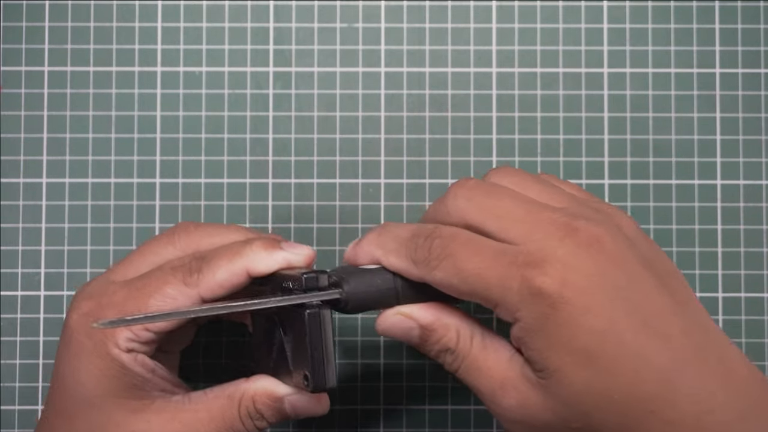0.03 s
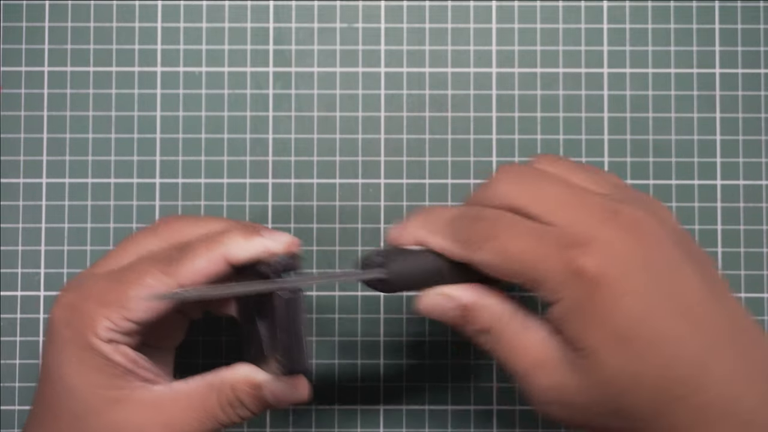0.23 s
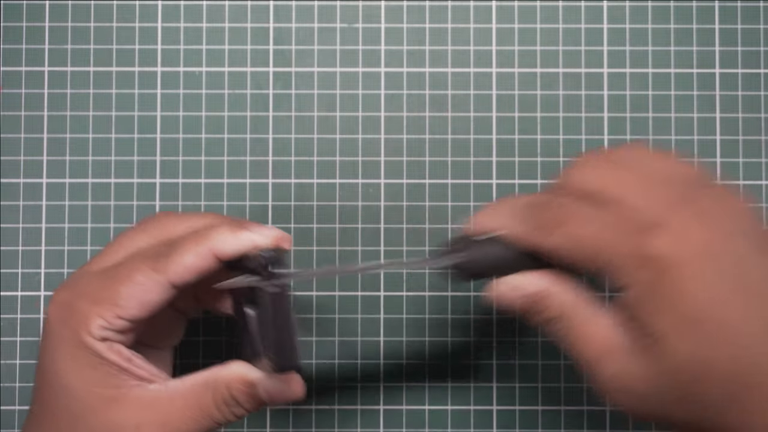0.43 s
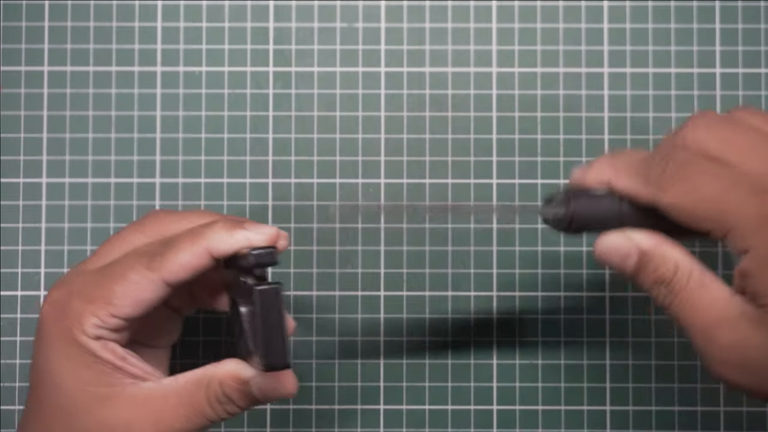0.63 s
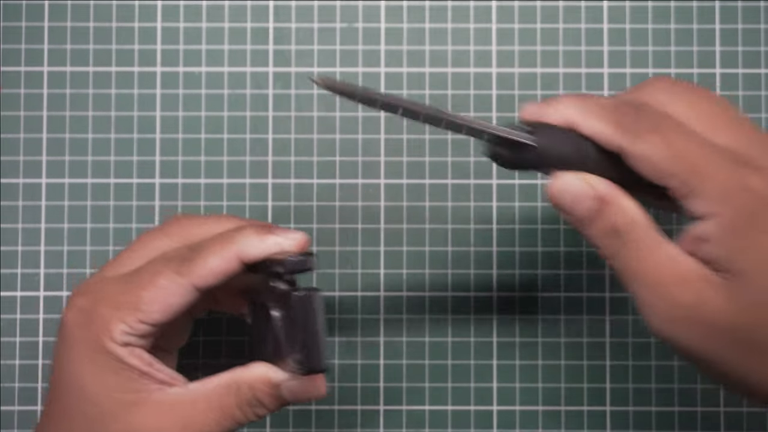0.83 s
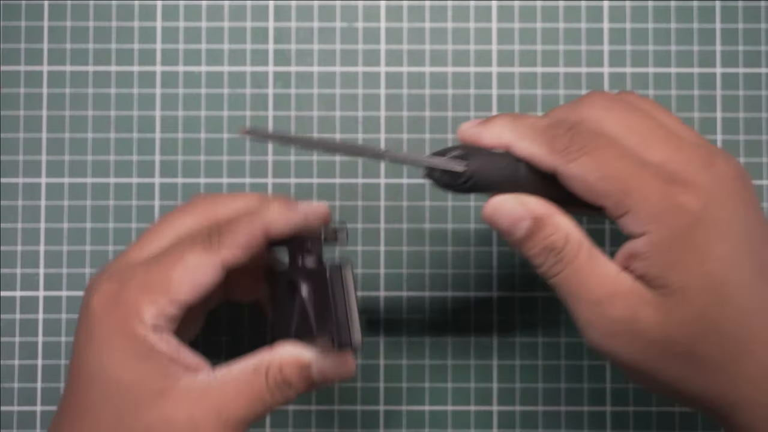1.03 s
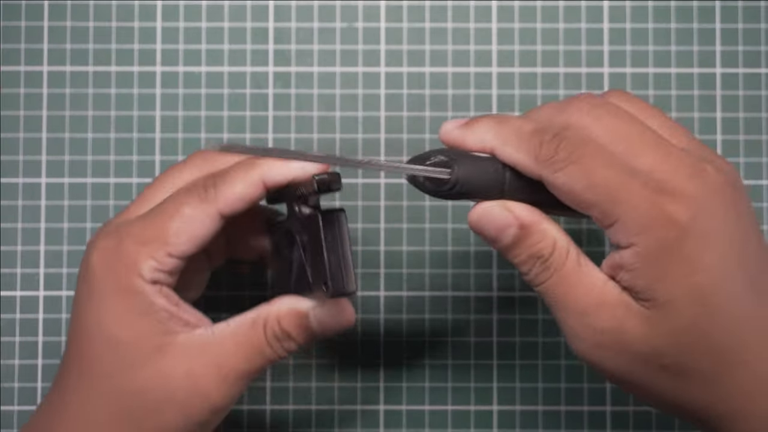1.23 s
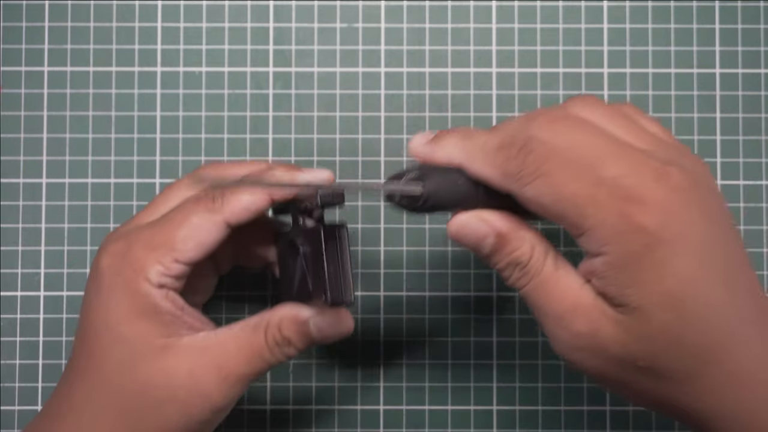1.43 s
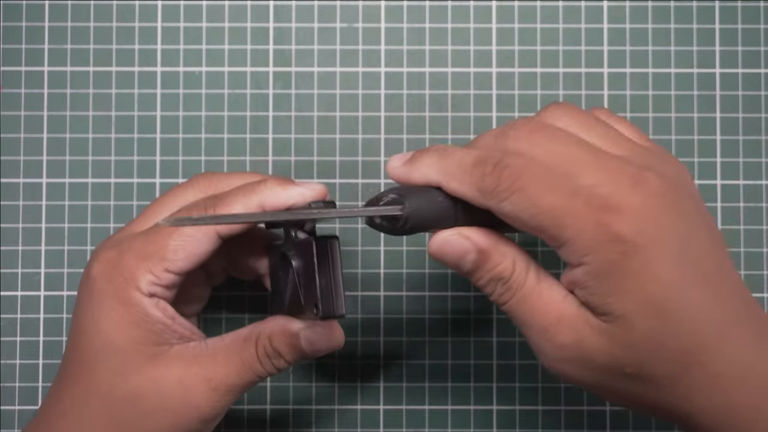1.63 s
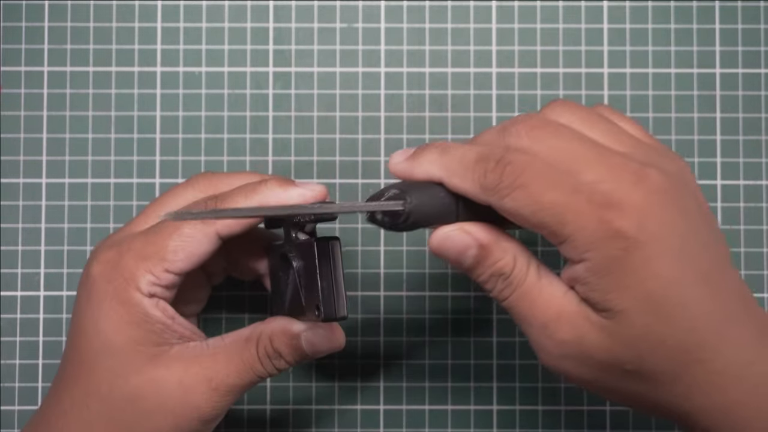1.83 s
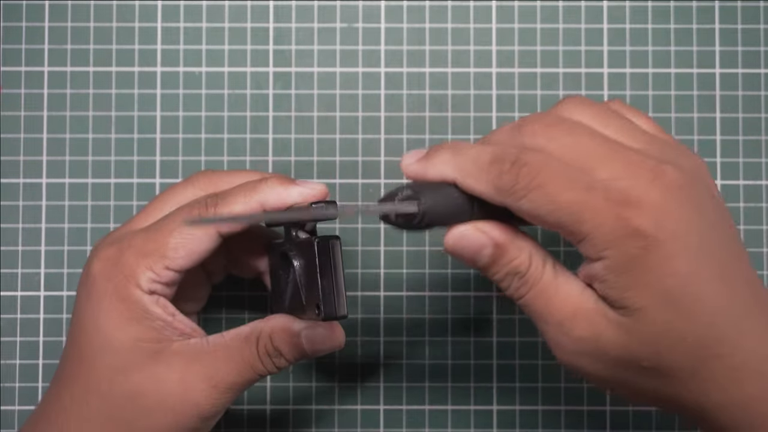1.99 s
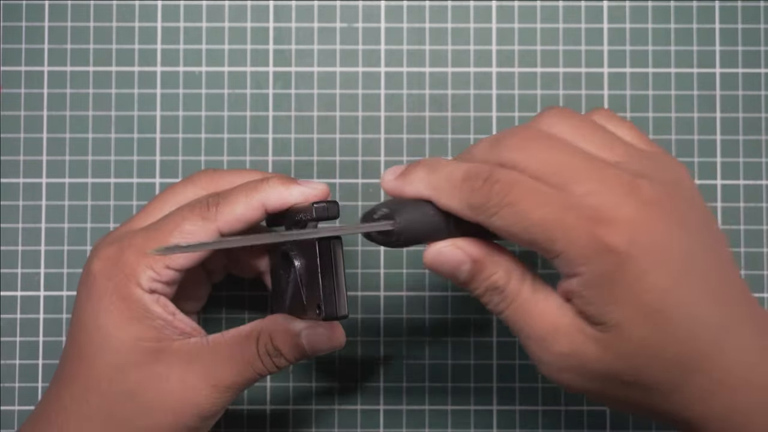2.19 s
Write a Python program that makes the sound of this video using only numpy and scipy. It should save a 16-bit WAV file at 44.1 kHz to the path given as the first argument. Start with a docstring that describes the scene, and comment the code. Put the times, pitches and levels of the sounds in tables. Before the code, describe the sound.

A knife scrapes harshly once through a hand sharpener, then glides lightly back in.

```python
"""Knife through a hand sharpener

A knife is drawn once through a small sharpener on a cutting mat, close to the microphone. The edge
bites, eases off and bites again, rasping and making the steel ring, then knocks the housing as it drops
out. The sharpener thumps the table and is slid back, and the blade glides lightly into the slot again.
A fan runs in the small, lively room."""
import sys
import numpy as np
from scipy import signal
from scipy.fft import rfft, irfft
from scipy.io import wavfile

SR = 44100
rng = np.random.default_rng(int(sys.argv[2]) if len(sys.argv) > 2 else 0)


def master_out(mix):
    """Clip the mix to full scale and print it as 16-bit PCM to the path in sys.argv[1]."""
    frames = np.transpose(np.atleast_2d(mix))
    ceiling = np.clip(frames, -1, 1)
    pcm = np.round(ceiling * 32767).astype(np.int16)
    wavfile.write(sys.argv[1], SR, pcm)


N = 103635

# In tone and note tables, the levels only compare one row with another.
# tone of steel being shaved: pitch_hz, level_db
RASP_TONE = [(400, -57), (900, -22), (1300, -2.5), (1600, -13), (1950, -3), (3600, -3.5), (4900, 4.5),
             (6200, 0.5), (7700, 2.5), (9000, -4.5), (11000, -9.5), (15500, -21.5)]
# tone of fine, high sizzle: pitch_hz, level_db
SIZZLE_TONE = [(3000, -17.5), (8000, 1.5), (11000, -9.5), (15500, -14)]


def knife_stroke():
    """The edge chatters through the jaws, rasping and ringing the steel; burrs add harsh cracks."""
    # how hard the edge presses on the sharpening jaws: time_s, level_db
    pressure = [(.205, -54), (.213, -13), (.218, -20), (.222, -41), (.226, -20.5), (.25, -14), (.272, -11),
                (.284, -17), (.293, -16), (.342, -24), (.352, -41), (.394, -72), (.409, -17.5), (.442, -16),
                (.455, -9.5), (.466, -15), (.489, -16), (.498, -23.5), (.526, -10), (.536, -15.5),
                (.552, -18), (.559, -29), (.578, -14.5), (.6, -55)]
    # the blade settles in the slot before the stroke: start_s, level_db, fade_s
    settling = [(.002, -36.5, 0.0018)]
    # the edge judders and kicks the jaws: start_s, level_db, fade_s
    judders = [(.227, -8, 0.0027), (.291, -22, 0.009), (.407, -47, 0.0036), (.449, -17.5, 0.008),
               (.4565, -14, 0.0019), (.472, -21, .003), (.483, -9.5, 0.0044), (.508, -14, .002),
               (.524, -10, 0.0022), (.537, -16, 0.0015)]
    # the edge catches on a burr and breaks free: start_s, level_db, fade_s, sizzle_share (0 to 1)
    catches = [(0.225, -10, 0.0028, 0), (0.235, -18, 0.00095, 0.4), (0.252, -17, 0.0017, 0),
               (0.295, -25, 0.011, .4), (0.458, -24, 0.0063, 0.1), (0.4876, -9, 0.0047, 0.4),
               (0.497, -20, 0.0038, 0.6), (0.506, -16.5, 0.0034, 0.5), (0.527, -21, 0.01, 1),
               (0.5423, -8.5, 0.0087, 0), (0.5482, -13, .002, 0.4)]
    # ringing of the jaws: pitch_hz, width_hz, level_db
    jaw_notes = [(2640, 57, 1), (2774, 150, -0.5), (2897, 91, 7.5), (3100, 160, -4)]
    # ringing of the blade: pitch_hz, width_hz, level_db
    blade_notes = [(4140, 72, -17), (4700, 350, -30), (5280, 274, -5), (5190, 314, -6.5), (6040, 440, -28),
                   (6360, 115, -13), (7260, 180, 1.5), (7500, 170, -12.5), (7600, 124, 2),
                   (8100, 440, -2.5)]
    chatter_db = 2 * (np.tanh(2 * wander(rate_hz=393.6)) + 0.5)
    slips = grit() * undb(chatter_db)
    force = level_curve(pressure) + bursts(settling)
    jaw_push = undb(-3.5) * force + bursts(judders) + bursts(settling)
    jaws = ring(slips * jaw_push, jaw_notes)
    blade = ring(slips * force, blade_notes)
    # as the blade is drawn out, its highest ring fades
    shrill_above_hz, fade_db_per_s, stroke_start_s = 7700, 29, 0.2
    shrill = signal.sosfiltfilt(signal.butter(6, shrill_above_hz, "high", fs=SR, output="sos"), blade)
    shrill_gain = undb(-fade_db_per_s * (seconds() - stroke_start_s))
    blade = blade - shrill * (1 - shrill_gain)
    coarse, fine = shape_tone(grit(), RASP_TONE), shape_tone(grit(), SIZZLE_TONE)
    cracks = sum(bursts([(start_s, level_db, fade_s)]) * blend(coarse, fine, share)
                 for start_s, level_db, fade_s, share in catches)
    rasp = force * shape_tone(slips, RASP_TONE)
    return jaws + undb(-0.5) * blade + undb(-5) * rasp + undb(2) * cracks


def tip_knocks():
    """The tip rattles against the housing as it leaves: each knock cracks and rings the plastic."""
    # the tip drops off the jaws and hits the housing: start_s, level_db, fade_s
    knocks = [(.5615, -20, 0.004), (.567, -13.5, 0.0041), (.5748, -8.5, 0.0016), (.5785, -4, 0.0015),
              (.592, -18.5, 0.0061)]
    # ringing of the housing: pitch_hz, width_hz, level_db
    housing_notes = [(1220, 140, -12.5), (1845, 133, 0), (1920, 90, -5), (2200, 37, 5), (2240, 44, 4.5),
                     (2456, 59, 3.5), (2790, 99, -2.5), (3350, 70, -6), (3950, 120, -6.5), (5260, 340, -14)]
    force = bursts(knocks)
    housing = ring(grit() * force, housing_notes)
    cracks = force * shape_tone(grit(), RASP_TONE)
    return housing + undb(-10.5) * cracks


def table_thumps():
    """The sharpener rocks, and the table under it makes a few slow swings."""
    # low thumps: peak_s, level_db, pitch_hz, fade_s
    thumps = [(.231, -7, 79, 0.009), (0.332, -13.5, 69.7, 0.016), (0.493, -21.5, 102.5, 0.018),
              (.628, -15.5, 71.4, 0.0077)]
    t = seconds()
    return sum(swell(peak_s, level_db, fade_s) * -np.cos(2 * np.pi * pitch_hz * (t - peak_s))
               for peak_s, level_db, pitch_hz, fade_s in thumps)


def mat_slides():
    """The sharpener and hand rub softly over the mat, with small ticks of plastic."""
    # slides over the mat: peak_s, level_db, fade_s, sizzle_share (0 to 1)
    slides = [(0.928, -37.5, 0.034, 0.48), (1.049, -45, 0.039, 0.47), (1.19, -46, 0.12, 0.25),
              (1.507, -55, 0.023, 0.4), (1.715, -48.5, 0.017, 0.5), (1.942, -53.5, 0.07, 0.6)]
    # tone of the rubbed mat: pitch_hz, level_db
    mat_tone = [(1000, -9), (2500, 6.5), (4000, 8), (8500, 0.5), (10000, -22), (15500, -59)]
    # the plastic ticks as it is set back: start_s, level_db, fade_s
    ticks = [(1.092, -46, 0.0044), (1.482, -52, .007), (1.732, -48, .003)]
    coarse, fine = shape_tone(rng.standard_normal(N), mat_tone), shape_tone(grit(), SIZZLE_TONE)
    rubbing = sum(swell(peak_s, level_db, fade_s) * blend(coarse, fine, share)
                  for peak_s, level_db, fade_s, share in slides)
    flicker = undb(1.9 * wander(rate_hz=70.07))
    return rubbing * flicker + bursts(ticks) * blend(coarse, fine, share=.4)


def blade_glide():
    """The blade glides lightly back into the slot, and the rubbing makes it ring thinly."""
    # strength of the rubbing: time_s, level_db
    rubbing = [(2.0, -58), (2.05, -47), (2.08, -42.5), (2.092, -37), (2.115, -48), (2.25, -40), (2.31, -37),
               (2.35, -33)]
    # ringing of the gliding blade: pitch_hz, width_hz, level_db
    glide_notes = [(3700, 114, 4.5), (4270, 115, -1.5), (4830, 120, -11), (7800, 2200, -23.5)]
    return ring(grit() * level_curve(rubbing), glide_notes)


def add_room(sound):
    """The walls of a small room add a wash of echoes; the top treble dies first."""
    low_decay_s, treble_decay_s, delay_s = .29, .26, .003  # a decay is the time to fall by 60 dB
    t, noise = seconds(), rng.standard_normal(N)
    low = signal.sosfiltfilt(signal.butter(4, 9000, fs=SR, output="sos"), noise)
    low_tail = low * 1000 ** (-t / low_decay_s)
    treble_tail = .7 * (noise - low) * 1000 ** (-t / treble_decay_s)
    tail = (low_tail + treble_tail) * (t > delay_s)
    return sound + undb(-11) * signal.fftconvolve(sound, tail / np.linalg.norm(tail))[:N]


def fan_and_hiss():
    """A fan rushes and hums steadily, over faint hiss."""
    # blurred humming of the fan and room: pitch_hz, width_hz, level_db
    hum_notes = [(67.2, 8.4, -1.5), (117.6, 13, -5.5), (203.7, 15, -14.5), (237.3, 6.9, -8),
                 (278.2, 5.2, -4), (354.3, 12.2, -10), (926, 11, -15.5), (1417, 20, -16.5)]
    # tone of the fan's rush: pitch_hz, level_db
    rush_tone = [(20, -1), (33, -1.5), (44, 1.5), (70, -2), (92, -5), (125, 2.5), (163, -12.5), (200, -4),
                 (300, -13.5), (400, -15), (520, -15.5), (700, -18), (1150, -18.5), (1480, -19.5),
                 (1800, -27), (2500, -50)]
    # tone of the hiss: pitch_hz, level_db
    hiss_tone = [(1200, -31), (2000, 10), (4000, 1.5), (7500, -1), (10000, -7), (15500, -15.5)]
    hum = undb(-32.5) * ring(rng.standard_normal(N), hum_notes)
    rush = undb(-27) * shape_tone(rng.standard_normal(N), rush_tone)
    hiss = undb(-46) * shape_tone(rng.standard_normal(N), hiss_tone)
    return hum + rush + hiss


def grit(slips_per_s=8800, spread_db=2.5):
    """The raw sound of scraping: a crowd of tiny slips of uneven size."""
    slips = rng.random(N) < slips_per_s / SR
    directions = rng.choice([-1, 1], N)
    sizes = undb(spread_db * np.clip(rng.standard_normal(N), -2, 2))
    return unit(slips * directions * sizes)


def ring(push, notes):
    """A pushed object rings at its own notes; a wider note dies sooner."""
    t = seconds()[:N // 20]
    response = sum((-1) ** k * undb(level_db) * width_hz  # every other note is flipped
                   * np.exp(-np.pi * width_hz * t) * np.sin(2 * np.pi * pitch_hz * t)
                   for k, (pitch_hz, width_hz, level_db) in enumerate(notes))
    return signal.fftconvolve(push, response / np.linalg.norm(response))[:N]


def shape_tone(sound, tone):
    """Give a sound the lows and highs of a tone table, at an average strength of 1."""
    pitch_hz, level_db = np.array(tone).T
    hz = np.arange(N // 2 + 1) * SR / N + 1
    gain = undb(np.interp(np.log(hz), np.log(pitch_hz), level_db))
    top_cut = np.minimum(pitch_hz[-1] / hz, 1) ** 10
    return unit(irfft(rfft(sound) * gain * top_cut, N))


def swell(peak_s, level_db, fade_s):
    """A bell-shaped rise and fall, down to about 60% at fade_s from its peak."""
    return undb(level_db) * np.exp(-((seconds() - peak_s) / fade_s) ** 2 / 2)


def bursts(rows):
    """Loudness shapes that start suddenly, hold briefly and die."""
    t = seconds()
    return sum((t >= start_s) * swell(start_s, level_db, fade_s) for start_s, level_db, fade_s in rows)


def level_curve(points):
    """Loudness along (time_s, level_db) points, silent outside them."""
    return undb(np.interp(seconds(), *np.array(points).T, left=-120, right=-120))


def wander(rate_hz):
    """A random drift that heads for a new value rate_hz times a second."""
    return unit(np.interp(seconds() * rate_hz, np.arange(4096), rng.standard_normal(4096)))


def blend(coarse, fine, share):
    """Mix two textures at constant power; share is the fine one's part."""
    return np.sqrt(1 - share) * coarse + np.sqrt(share) * fine


def undb(db):
    """Turn decibels into a multiplier."""
    return 10 ** (np.asarray(db) / 20)


def unit(x):
    """Scale to an average strength (rms) of 1."""
    return x / np.sqrt(np.mean(x ** 2))


def seconds():
    """Time of every sample."""
    return np.arange(N) / SR


def scene():
    """All sources at one microphone."""
    sharpening = undb(1) * (knife_stroke() + tip_knocks()) + mat_slides() + blade_glide()
    return (add_room(sharpening) + table_thumps() + fan_and_hiss())[None]


def record(dry):
    """Automatic volume dips under the scrape and recovers slowly; peaks clip and the top treble is cut."""
    threshold_db, squeeze, follow_s = -22, 0.24, 0.25
    ceiling, top_hz = .84, 15750
    step = 1 / (follow_s * SR)
    loudness = np.sqrt(signal.lfilter([step], [1, step - 1], dry ** 2))
    gain = np.maximum(loudness / undb(threshold_db), 1) ** -squeeze
    clipped = np.clip(dry * gain, -ceiling, ceiling)
    return signal.sosfilt(signal.ellip(12, .2, 75, top_hz, fs=SR, output="sos"), clipped)


dry = scene()
out = record(dry)
master_out(out)
```